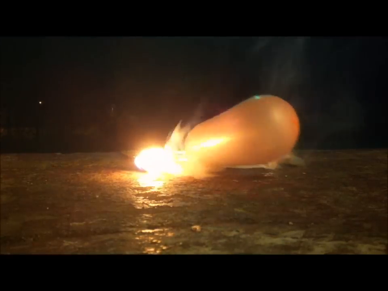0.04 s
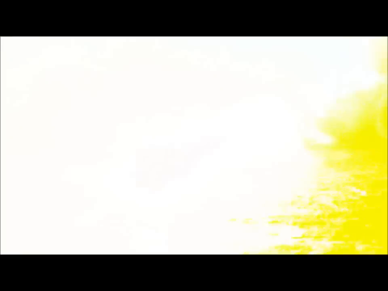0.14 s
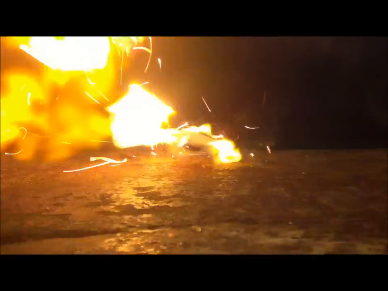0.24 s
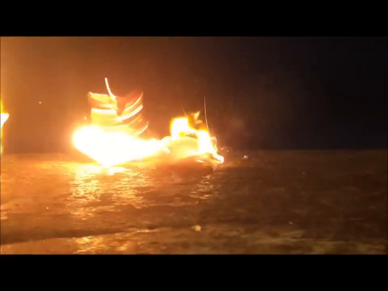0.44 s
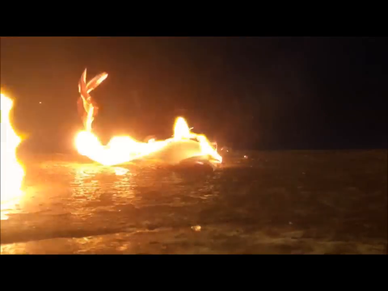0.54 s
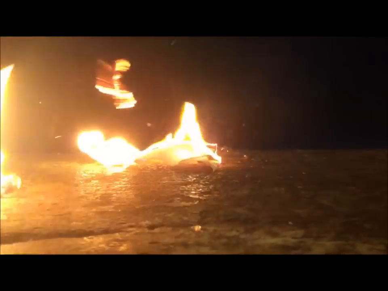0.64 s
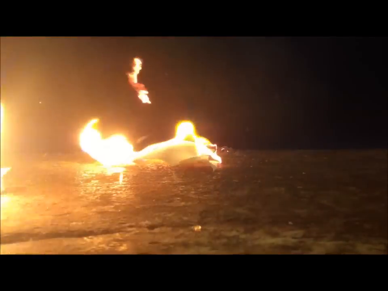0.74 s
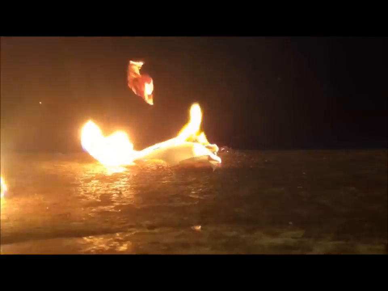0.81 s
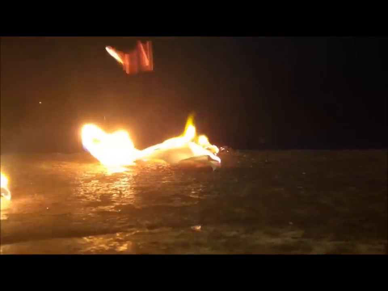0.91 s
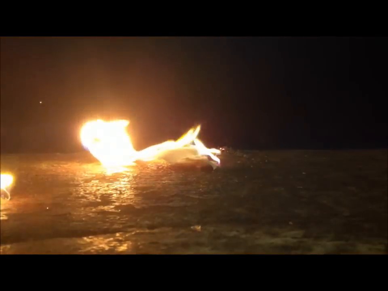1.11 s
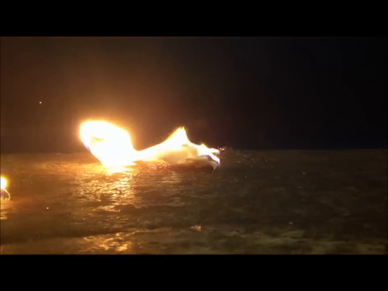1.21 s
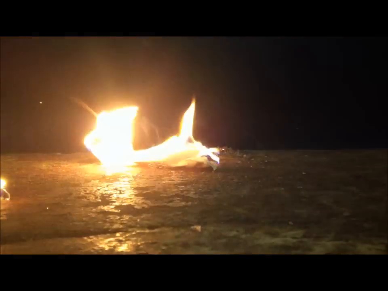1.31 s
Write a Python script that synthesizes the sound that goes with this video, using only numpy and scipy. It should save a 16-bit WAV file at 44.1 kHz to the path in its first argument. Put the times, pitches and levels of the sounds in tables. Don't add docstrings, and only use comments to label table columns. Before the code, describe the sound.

A gas balloon goes off in one hard, clipped crack and boom after a quiet quarter second; dense low reverberation rolls between walls and distant buildings, fading into faint hiss on a small camera microphone.

```python
import sys
import numpy as np
from scipy import signal
from scipy.io import wavfile
from scipy.ndimage import uniform_filter1d

SR = 44100
rng = np.random.default_rng(int(sys.argv[2]) if len(sys.argv) > 2 else 0)


def invert_db(level):
    return 10 ** (np.asarray(level, dtype=float) / 20)


def output_pcm(signal):
    pcm = np.clip(np.atleast_2d(signal).T, -1, 1) * 32767
    wavfile.write(sys.argv[1], SR, np.round(pcm).astype(np.int16))


N = 59535

# freq_hz, density_db_per_hz
FIRE_COLOUR = [(40, -25.5), (100, 4.5), (250, -6.5), (450, -10.5), (1500, -17), (4000, -41)]
# time_s, level_db
FIRE_LEVEL = [(0, -70), (.1, -66), (.19, -64), (.22, -60), (.4, -69), (1.35, -71)]
# freq_hz, density_db_per_hz
HISS_COLOUR = [(20, 5), (100, 0.5), (1000, 2), (4000, 1), (8000, -1), (10000, -4.5), (13000, -1.5),
               (15800, -3.5)]
# freq_hz, density_db_per_hz
CRACK_COLOUR = [(500, -9.5), (2300, 0.5), (3000, -16.5), (6000, -22), (10000, -27), (16000, -27)]
# start_s, pitch_hz, level_db, t60_s
SKIN_SNAP = (.2389, 2200, -14, .012)
# start_s, overpressure_db, positive_phase_ms
SHOCKS = [
    (.2389, -11, 0.079),
    (.2398, 7, 0.56),
    (.2408, -5, 0.071),
    (.2420, -3, 0.6578),
    (.2431, 3.5, 2.2),
    (.2451, 3.5, 0.31),
]
# start_s, suction_db, length_ms
INRUSH = [
    (.2393, -1, 0.12),
    (.2413, -2, 0.99),
    (.2428, -2.5, 0.34),
    (.2456, 3.5, 2),
]
# freq_hz, density_db_per_hz
TAIL_COLOUR = [(24, -71), (40, -41.5), (134, -5.5), (175, -13.5), (510, -15), (650, -22), (1120, -27),
               (5000, -73), (6500, -106), (11000, -120)]
# freq_hz, t60_s
TAIL_T60 = [(60, .4), (160, 0.43), (420, .27), (1100, .23), (2000, .26), (2900, .26)]
# pitch_hz, level_db, t60_s
YARD_RING = (165, -21.5, .35)
# pitch_hz, level_db, t60_s
RAILINGS = [(410, -48, .4), (510, -47, .45), (660, -55, .6), (805, -58, .6), (830, -57, .65),
            (930, -58, .55)]
# start_s, level_db, positive_phase_ms
ECHOES = [(.2560, 5.5, 0.96), (.261, -37, 1.6), (.282, -15.5, 0.55), (.293, -6, 1.3), (.312, -14.5, 1.2),
          (.329, -12, 0.78), (.355, -20, 0.86), (.379, -17.5, 1.1), (.41, -24, 0.95)]
# peak_time_s, level_db, length_s
ROLLS = [(0.447, -50.5, 0.067), (.525, -56, 0.036), (0.561, -59, .03), (0.621, -60.5, 0.028),
         (0.687, -58.5, 0.024), (0.729, -65, 0.026), (0.771, -61.5, 0.025), (0.805, -58.5, 0.019),
         (0.922, -65.5, .03), (1.033, -61.5, 0.023), (1.145, -59, .024), (1.27, -66, 0.038),
         (1.317, -73, .02)]
# freq_hz, density_db_per_hz
ROLL_COLOUR = [(50, -23), (100, -3.5), (165, -0.5), (240, -7.5), (330, -18), (600, -26.5), (1500, -50.5)]

TEAR_START_S, TEAR_END_S, TEAR_DB, SPIT_DB = .2337, .2387 + .0088, -48, -32.5
SHOCK_RISE_S, ECHO_RISE_S, SUCTION = .00006, .0008, 1
TAIL_START_S, TAIL_RISE_S, TAIL_DB = .248, .018, -22
LATE_DB, LATE_T60_S, LATE_HZ, LATE_WIDTH_HZ = -51, .72, 800, 750
CAPSULE_LIMIT, CEILING = 1.4, 1.0
LOW_CUT_HZ, LOW_CUT_WIDTH_HZ, SUB_CUT_HZ = 163.4, 114, 85
PORT_HZ, PORT_WIDTH_HZ, EDGE_HZ = 2172, 2900, 15900
HISS_DB, DUCK_AT_S, DUCK_DB, RECOVER_S = -64, .266, 15, .76
MUTE_FROM_S, MUTE_TO_S, MUTE_DB = .2251, .2335, 26.5


def read(points, at, log=False):
    x, y = np.transpose(points)
    if log:
        return np.interp(np.log(at + 1), np.log(x + 1), y)
    return np.interp(at, x, y)


def noise(colour, field_db=0., size=512):
    hop = size // 4
    hz = np.fft.rfftfreq(size, 1 / SR)
    t = np.arange(N // hop + 5) * hop / SR
    real, imag = rng.standard_normal((len(t), len(hz), 2)).T
    shape = invert_db(read(colour, hz, True))[:, None]
    if callable(field_db):
        field_db = field_db(hz[:, None], t)
    spectra = (real + 1j * imag) * shape * invert_db(field_db)
    sound = signal.istft(spectra, nperseg=size, noverlap=size - hop)[1][:N]
    return sound / np.sqrt((shape ** 2).sum() * 1.5)


def ring(start_s, pitch_hz, level_db, t60_s, rise_s):
    t = np.maximum(np.arange(N) / SR - start_s, 0)
    envelope = invert_db(level_db - 60 * t / t60_s) * np.minimum(t / rise_s, 1)
    return envelope * np.sin(2 * np.pi * pitch_hz * t)


def fronts(rows, rise_s):
    t = np.arange(N) / SR
    out = np.zeros(N)
    for start_s, level_db, phase_ms in rows:
        u = np.clip((t - start_s) / (phase_ms / 1000), 0, 60)
        out += invert_db(level_db) * (t > start_s) * (1 - SUCTION * u) * np.exp(-u)
    pole = np.exp(-1 / (rise_s * SR))
    return signal.lfilter([(1 - pole) ** 2], [1, -2 * pole, pole * pole], out)


def fire():
    flutter = uniform_filter1d(rng.standard_normal(N), 1500) * 39
    flutter = np.clip(flutter, -2, 2)
    level_db = read(FIRE_LEVEL, np.arange(N) / SR) + 2.1 * flutter
    return invert_db(level_db) * noise(FIRE_COLOUR, size=2048)


def hiss():
    t = np.arange(N) / SR
    recovery = np.exp(-np.maximum(t - DUCK_AT_S, 0) / RECOVER_S)
    duck_db = DUCK_DB * (t > DUCK_AT_S) * recovery
    return invert_db(HISS_DB - duck_db) * noise(HISS_COLOUR)


def crack():
    t = np.arange(N) / SR
    tear = invert_db(TEAR_DB) * np.clip((t - TEAR_START_S) / .0009, 0, 1) * (t < TEAR_END_S)
    spits = np.zeros(N)
    for start_s, level_db, _ in SHOCKS:
        spits += invert_db(level_db) * np.exp(-((t - start_s - .0003) / .0005) ** 2)
    level = tear + invert_db(SPIT_DB) * spits
    return level * noise(CRACK_COLOUR, size=256) + ring(*SKIN_SNAP, .0003)


def blast():
    return fronts(SHOCKS, SHOCK_RISE_S) - fronts(INRUSH, SHOCK_RISE_S)


def tail_field_db(hz, t):
    return TAIL_DB - 60 * np.maximum(t - TAIL_START_S, 0) / read(TAIL_T60, hz, True)


def tail():
    t = np.arange(N) / SR - TAIL_START_S
    near = noise(TAIL_COLOUR, tail_field_db)
    wash = [(hz, -20 * ((hz - LATE_HZ) / LATE_WIDTH_HZ) ** 2) for hz in np.arange(50, 2500, 50)]
    late = noise(wash, size=2048) * invert_db(LATE_DB - 60 * t / LATE_T60_S)
    return np.clip(t / TAIL_RISE_S, 0, 1) * (near + late)


def yard_ring():
    return sum(ring(TAIL_START_S, *mode, .02) for mode in [YARD_RING, *RAILINGS])


def echoes():
    return fronts(ECHOES, ECHO_RISE_S)


def rumble():
    t = np.arange(N) / SR
    power = np.zeros(N)
    for start_s, level_db, length_s in ROLLS:
        power += invert_db(2 * level_db) * np.exp(-((t - start_s) / length_s) ** 2)
    roll = noise(ROLL_COLOUR, size=2048)
    return np.sqrt(power / (uniform_filter1d(roll ** 2, size=900) + .2)) * roll


def scene():
    return (fire() + blast() + tail() + yard_ring() + echoes() + rumble())[None]


def capsule(pressure):
    w = 2 * np.pi
    x = CAPSULE_LIMIT * np.tanh(pressure / CAPSULE_LIMIT)
    low_cut = signal.bilinear([1, 0, 0], [1, w * LOW_CUT_WIDTH_HZ, (w * LOW_CUT_HZ) ** 2], SR)
    x = signal.lfilter(*low_cut, x)
    port_sq = (w * PORT_HZ) ** 2
    port = signal.bilinear([port_sq], [1, w * PORT_WIDTH_HZ, port_sq], SR)
    x = signal.lfilter(*port, x)
    return signal.sosfilt(signal.butter(3, SUB_CUT_HZ, "high", fs=SR, output="sos"), x)


def low_pass(x):
    return signal.sosfilt(signal.butter(12, 16950, fs=SR, output="sos"), x)


def record(dry):
    t = np.arange(N) / SR
    x = capsule(dry) + hiss() + crack()
    x = x * invert_db(-MUTE_DB * ((t > MUTE_FROM_S) & (t < MUTE_TO_S)))
    x = x / (1 + abs(x / CEILING) ** 8) ** (1 / 8)
    x = signal.oaconvolve(x, signal.firwin(255, EDGE_HZ, fs=SR)[None], "same")
    return low_pass(x)


dry = scene()
out = record(dry)
output_pcm(out)
```